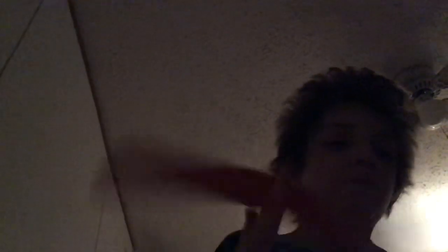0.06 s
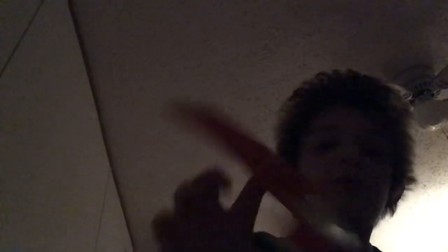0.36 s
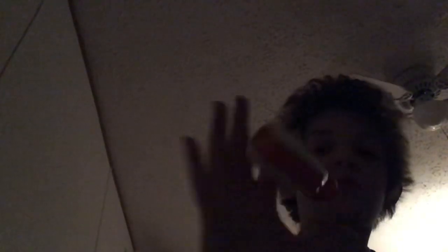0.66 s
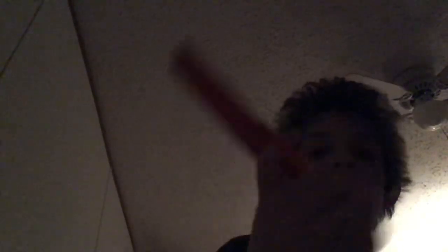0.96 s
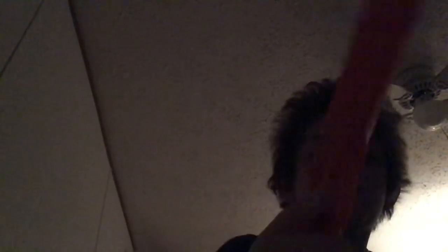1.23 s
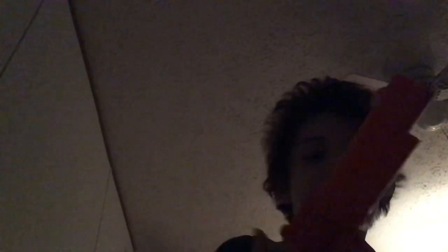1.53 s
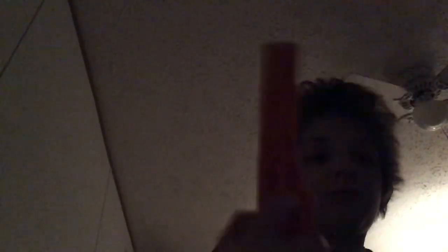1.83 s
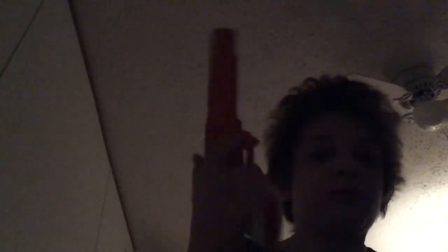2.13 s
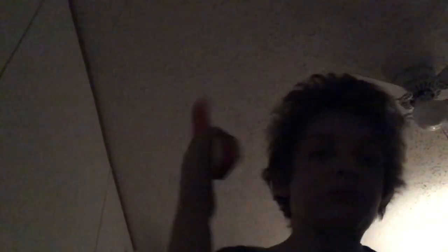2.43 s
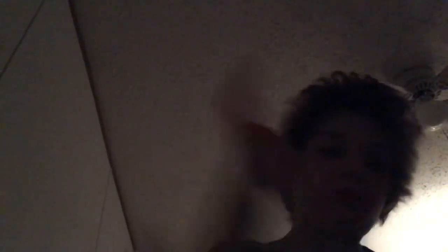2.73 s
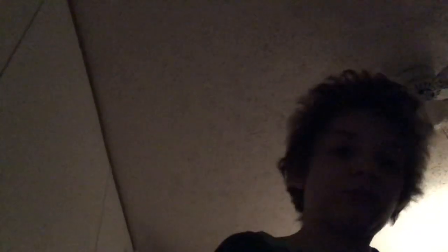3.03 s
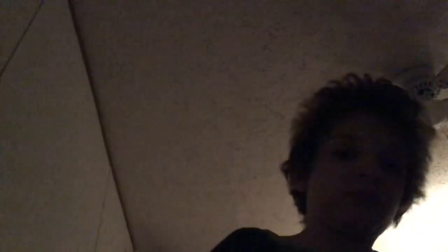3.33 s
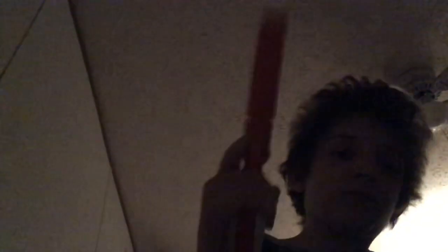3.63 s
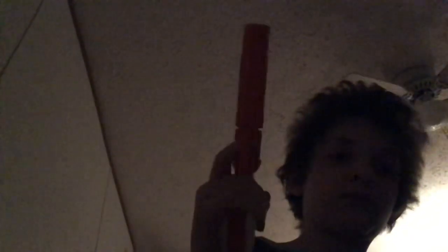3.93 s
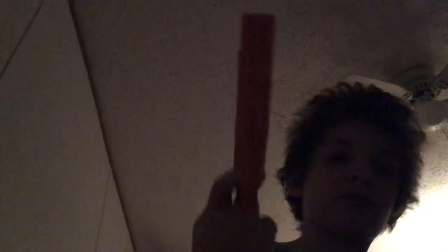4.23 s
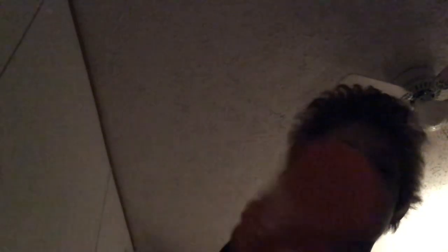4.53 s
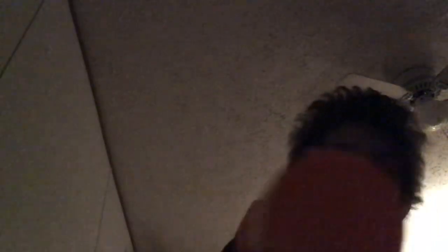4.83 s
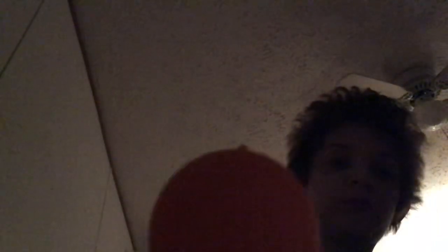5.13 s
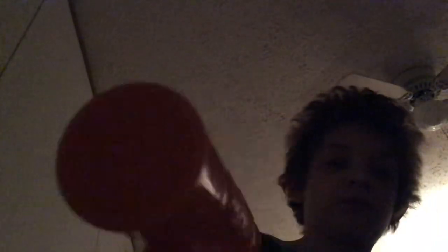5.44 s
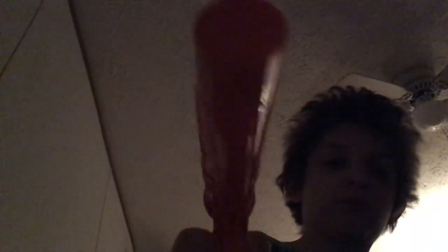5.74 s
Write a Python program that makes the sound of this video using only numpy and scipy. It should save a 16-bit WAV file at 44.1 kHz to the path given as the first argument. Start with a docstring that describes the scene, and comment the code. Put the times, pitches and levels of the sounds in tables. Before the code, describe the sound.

A plastic toy gun is turned in the hand close to a small microphone in a quiet room. It squeaks briefly, then its shell rubs and clicks. It is cocked in a quick cluster of snaps with a faint spring ring, and fires one sharp shot. After a pause with light ticks, two more shots follow quickly, the first of them loudest, with a thump of air on the microphone.

```python
"""A plastic toy gun is turned in the hand, close to a small microphone in a quiet room.
It squeaks briefly in the grip, then its shell rubs and clicks. It is cocked in a cluster of snaps
that ring the spring, and fired three times: one shot, a pause, then two in quick succession.
The second shot hits the microphone with a puff of air from the plunger.
The limiter ducks the loud bangs, so the room's answer swells up just after them."""
import sys
import numpy as np
from scipy import signal
from scipy.fft import rfft, irfft, next_fast_len
from scipy.io import wavfile
from scipy.ndimage import uniform_filter1d, minimum_filter1d, map_coordinates

SR = 44100
rng = np.random.default_rng(int(sys.argv[2]) if len(sys.argv) > 2 else 0)


def store_wav(level_fs):
    """Save 16-bit WAV to argv[1]."""
    pcm = np.round(np.clip(np.atleast_2d(level_fs), -1, 1) * 32767)
    wavfile.write(sys.argv[1], SR, pcm.T.astype(np.int16))


N = 258867

# Hard contacts: the shell knocks hard in the hand, or the catch or plunger strikes home; knock and clack are
# relative to the level: # start_s, level_db, knock_db, clack_db, t60_s, run_up_s, run_up_db, spring_db
SNAPS = [(0.2034, -19.5, -18.5, -17.5, 0.033, 0.0047, -36.5, -70),
         (1.7924, -26.5, -9, -14, 0.023, 0.015, -45, -70), (1.8294, -25, -25, -22, 0.014, 0.014, -43, -65),
         (2.7275, -15.5, -9, -16.5, 0.028, 0.004, -62, -60),
         (2.7395, -17, -17.5, -23.5, 0.023, 0.0066, -33, -40),
         (2.8377, -11.5, -24.5, -23.5, 0.014, 0.0207, -17.5, -46),
         (2.8828, -13, -42, -31, 0.0092, 0.004, -55, -37.5),
         (2.9186, -18, -34, -33, 0.006, 0.004, -43, -51),
         (3.565, 7.5, -23.5, -19, 0.026, 0.0067, -6.5, -28.5),
         (5.3825, 17.5, -17, -19, 0.014, 0.0245, -29, -51),
         (5.6272, -21.5, -9, -7, 0.013, 0.01, -50, -70.5),
         (5.6412, 4.5, -20, -20, 0.016, 0.005, -37.5, -62)]


def amp(db):
    """Decibels to gain."""
    return 10 ** (np.asarray(db) / 20)


def unit(x):
    """Scale to rms 1."""
    return x / np.sqrt(np.mean(x ** 2) + 1e-20)


def along(points, hz):
    """Read a curve of (freq_hz, value) points on a log frequency axis."""
    freqs, values = np.transpose(points)
    return np.interp(np.log(hz + 1), np.log(freqs + 1), values)


def filtered(x, response):
    """Filter x by a complex response, given as a function of frequency."""
    size = next_fast_len(N + SR // 2)
    return irfft(rfft(x, size) * response(np.fft.rfftfreq(size, 1 / SR)), size)[:N]


def noise(spectrum):
    """Coloured noise of rms 1."""
    return unit(filtered(rng.standard_normal(N), lambda hz: amp(along(spectrum, hz))))


def wobble(rate):
    """A smooth random curve with `rate` knots a second."""
    knots = rng.standard_normal(int(N * rate / SR) + 4)
    return map_coordinates(knots, [np.arange(N) * rate / SR])


def add(track, start_s, sound):
    """Mix a sound into the track at start_s."""
    part = track[max(round(start_s * SR), 0):][:len(sound)]
    part += sound[:len(part)]


def hiss():
    """A faint, steady bed of noise."""
    spectrum = [(20, -41), (40, -21), (65, -3.5), (110, -2), (220, -6.5), (400, -8.5), (800, -14.5),
                (1500, -15.5), (3000, -15), (5000, -19.5), (7300, -20), (9200, -13), (11000, -18),
                (13000, -27.5), (16000, -32.5)]  # colour of the bed: freq_hz, level_db
    return amp(-65.5) * noise(spectrum)


def room(x, build_up_s, treble_db):
    """Wall echoes thicken into a short, bright tail whose treble dies first."""
    decay = [(100, 0.27), (500, 0.26), (1500, 0.35), (4000, 0.35), (8000, 0.28), (15000, 0.2)]  # reverb time of the room: freq_hz, t60_s
    hz, t, bands = signal.stft(rng.standard_normal(SR // 2), SR, nperseg=256)
    colour_db = along([(2000, 0), (14000, treble_db)], hz)[:, None]
    decay_db = 60 * t / along(decay, hz)[:, None]
    tail = signal.istft(bands * amp(colour_db - decay_db), SR, nperseg=256)[1]
    tail *= 1 - np.exp(-(np.arange(len(tail)) / SR / build_up_s) ** 2)
    return signal.oaconvolve(x, tail / np.linalg.norm(tail))[:N]


def echoes(clicks, soft_layers, directions):
    """The shell radiates differently in each direction, and each takes its own way round the room."""
    send_curve = [(0, -15), (2.7, -11.5), (3.601, -11.5), (5.39, -16), (5.618, -19)]  # reverb send, lower as the toy nears the microphone: time_s, level_db
    send = amp(np.interp(np.arange(N) / SR, *np.transpose(send_curve)))
    reverb = np.zeros(N)
    for _ in range(directions):
        radiated = action() + handling(clicks) + soft_layers
        reverb += room(send * radiated, build_up_s=0.016, treble_db=7.0)
    return reverb / np.sqrt(directions)


def rubbing(grain_db, grain_hz, catch_db, catch_hz):
    """The toy slides in the palm, catching and letting go; tiny slips roughen slide and strokes."""
    slide = [(0.02, -53), (0.09, -68), (0.17, -57.5), (0.28, -52), (0.41, -61), (0.49, -58.5), (0.53, -97),
             (0.88, -74), (0.93, -57.5), (1.02, -64.5), (1.08, -57.5), (1.24, -60), (1.35, -74.5),
             (1.67, -71), (1.8, -54.5), (1.87, -80)]  # friction as the toy is turned over: time_s, level_db
    strokes = [(1.982, 0.036, -55), (2.64, 0.11, -57.5), (2.743, 0.037, -33.5), (3.016, 0.12, -55),
               (3.337, 0.12, -55), (3.499, 0.15, -51)]  # plastic brushing plastic and skin: start_s, length_s, level_db
    spectrum = [(200, -11.5), (900, -10), (1700, -6.5), (2200, -3.5), (3000, -1.5), (4800, -7), (6800, -5),
                (10000, -6), (12500, -23), (16000, -24)]  # colour of the friction: freq_hz, level_db
    slide_db = np.interp(np.arange(N) / SR, *np.transpose(slide), right=-np.inf)
    envelope = amp(slide_db + catch_db * wobble(catch_hz))
    for start_s, length_s, level_db in strokes:
        progress = np.linspace(0, 1, int(length_s * SR))
        swell = np.abs(np.sin(np.pi * progress ** 0.66))  # quick rise, slower fade
        add(envelope, start_s, amp(level_db) * swell)
    return envelope * unit(noise(spectrum) * amp(grain_db * wobble(grain_hz)))


def squeak(jitter, flutter_db):
    """The grip sticks and slips unevenly, fast enough to give a thin tone."""
    contour = [(0.037, 1500, -73), (0.06, 1480, -54), (0.095, 1464, -55), (0.13, 1450, -70),
               (0.17, 1450, -55.5), (0.2, 1416, -58)]  # path of the squeak: time_s, pitch_hz, level_db
    partials = [(1, -13.5), (2, -1.5), (3, -8.5), (4, -5), (5, -9)]  # its timbre: harmonic_number, level_db
    time_s, pitch_hz, level_db = np.transpose(contour)
    t = np.arange(N) / SR
    wavering_hz = np.interp(t, time_s, pitch_hz) * (1 + jitter * wobble(900))
    phase = 2 * np.pi * np.cumsum(wavering_hz) / SR
    tone = sum(amp(db + flutter_db * wobble(149)) * np.sin(k * phase) for k, db in partials)
    return unit(tone) * np.interp(t, time_s, amp(level_db), left=0, right=0)


def contacts(hits, crack_db, knock_db, clack_db, ring_out, attack_s):
    """Each contact cracks at the edge, knocks the hollow of the shell and clacks in the walls."""
    # Colours of the bright edge, the hollow and the walls: freq_hz, level_db
    crack_spectrum = [(300, -34.5), (1200, -21.5), (2200, -21.5), (3200, -15), (5400, -3.5), (6600, 3.5),
                      (7400, 1), (8800, 2.5), (10500, -2), (12500, -8), (15000, -15.5), (16500, -32.5)]
    knock_spectrum = [(30, -46), (100, -20), (300, -14), (550, -3), (820, -9), (1150, -10), (1650, 1),
                      (2050, -7), (2900, -5), (4500, -9), (9000, -23)]
    clack_spectrum = [(800, -25), (2100, -14.5), (2600, 0.5), (3100, 2.5), (3450, -3), (3900, 1.5),
                      (5000, -9), (8000, -12), (16000, -38)]
    t = np.arange(SR // 4) / SR
    crack, knock, clack = np.zeros((3, N))
    rise = 1 - np.exp(-t / attack_s)
    for start_s, level_db, hollow_db, wall_db, t60_s in hits:  # overlapping contacts add in power
        add(crack, start_s, (amp(level_db - 60 * t / t60_s) * rise) ** 2)
        body = amp(level_db - 60 * t / (t60_s * ring_out)) * rise
        add(knock, start_s, (amp(hollow_db) * body) ** 2)
        add(clack, start_s, (amp(wall_db) * body) ** 2)
    # The shell's many damped modes blur into noise.
    layers = [(crack_db, crack, crack_spectrum), (knock_db, knock, knock_spectrum),
              (clack_db, clack, clack_spectrum)]
    return sum(amp(db) * np.sqrt(power) * noise(spectrum) for db, power, spectrum in layers)


def fidget_ticks(per_s, scatter_db):
    """Cues for handling(): loose parts tick faintly at uneven gaps as the fingers shift their grip."""
    fidgets = [(0.36, 0.4), (1.08, 1.22), (1.49, 1.66), (2.02, 2.17), (4.48, 4.59), (5.26, 5.34)]  # spells of finger movement: start_s, end_s
    level_db, knock_db, clack_db = -47.5, -14, -9
    ticks = []
    for start_s, end_s in fidgets:
        slots = np.arange(start_s, end_s, 1 / per_s)
        for slot_s, (late, strength) in zip(slots, rng.random((len(slots), 2))):
            tick_db = level_db + scatter_db * (2 * strength - 1)
            ticks.append((slot_s + late / per_s, tick_db, knock_db, clack_db))
    return ticks


def handling(clicks, t60_s=0.022):
    """Loose parts click as the toy turns in the hand."""
    hits = [(*click, t60_s) for click in clicks]
    return contacts(hits, crack_db=-8.0, knock_db=4.0, clack_db=2.0, ring_out=1.73, attack_s=0.00044)


def shell_notes():
    """A knock rings one damped note of the shell, set by where it is struck and held."""
    knocks = [(0.204, 493, -41, 0.037), (1.123, 3240, -35.5, 0.021), (1.7934, 1660, -35, 0.034),
              (2.825, 1528, -28.5, 0.037), (3.566, 1120, -18, 0.015), (3.567, 654, -27.5, 0.0098)]  # hollow notes: start_s, pitch_hz, level_db, t60_s
    t, notes = np.arange(SR // 4) / SR, np.zeros(N)
    for start_s, pitch_hz, level_db, t60_s in knocks:
        add(notes, start_s, amp(level_db - 60 * t / t60_s) * np.sin(2 * np.pi * pitch_hz * t))
    return notes


def spring(scatter_db):
    """Every snap rings the spring's modes at new strengths."""
    modes = [(1530, -19, 0.09), (2896, -13, .42), (3800, -17, 0.149), (6300, -9.5, .09), (6550, 8, 0.041),
             (7000, -2, .07), (7850, -6.5, 0.07), (8310, -8, .06), (9400, -5.5, .07), (10270, -4.5, 0.1)]  # resonances of the spring and its catch: pitch_hz, level_db, t60_s
    t, ring = np.arange(SR // 2) / SR, np.zeros(N)
    pitch_hz, level_db, t60_s = np.transpose(modes)[:, :, None]
    tones = amp(level_db - 60 * t / t60_s) * np.sin(2 * np.pi * pitch_hz * t)
    for start_s, *_, spring_db in SNAPS:
        strengths = amp(spring_db + rng.normal(0, scatter_db, len(modes)))
        add(ring, start_s, strengths @ tones)
    return ring


def puff(start_s, level_db, tilt_db, corner_hz=58, top_hz=900):
    """The plunger's air reaches the microphone as one low push; more tilt makes it thinner."""
    def response(hz):
        hump = (hz / corner_hz) ** 5 / (1 + (hz / corner_hz) ** 2) ** 4 / (1 + (hz / top_hz) ** 4)
        colour = hump * amp(tilt_db * np.log2(hz + 1))
        return colour / np.mean(colour)

    push = np.zeros(N)
    add(push, start_s, amp([level_db]))
    return filtered(push, response)


def action(teeth=4, rebound_s=0.0085, rebound_loss_db=8, rebound_max_db=-15):
    """Hard knocks in the hand, cocking and firing: each snap is a run-up over evenly spaced teeth, a blow and
    one rebound."""
    chatter = (-10.5, -16, 0.02)  # the plunger on the teeth of its guide: knock_db, clack_db, t60_s
    hits = []
    for start_s, level_db, knock_db, clack_db, t60_s, run_up_s, run_up_db, _ in SNAPS:
        tooth_times = np.linspace(start_s - run_up_s, start_s, teeth, endpoint=False)
        hits += [(tooth_s, run_up_db, *chatter) for tooth_s in tooth_times]
        hits.append((start_s, level_db, knock_db, clack_db, t60_s))
        rebound_db = min(level_db - rebound_loss_db, rebound_max_db)  # capped by the short travel
        hits.append((start_s + rebound_s, rebound_db, knock_db, clack_db, t60_s))
    return contacts(hits, crack_db=-6.5, knock_db=-0.5, clack_db=3.5, ring_out=0.84, attack_s=0.00076)


def scene():
    """The toy and its room over a faint hiss, in mono."""
    # Light clicks of shell and trigger; knock and clack are relative to the level:
    # start_s, level_db, knock_db, clack_db
    shell_clicks = [(0.312, -42, -29, -5), (0.332, -35.5, -34, -34), (0.3726, -38, -16, -15.5),
                    (0.4078, -39, -17, -9.5), (0.444, -33.5, -12.5, -11.5), (0.538, -42.5, -16.5, -10.5),
                    (0.7926, -39, -24, -12.5), (0.799, -27.5, -25, -15), (0.9263, -34, -35, -18),
                    (1.037, -27, -33, -20.5), (1.061, -33, -20, -13.5), (1.1209, -28, -24, -14.5),
                    (1.142, -36.5, -26, -12), (1.1882, -41, -15, -13), (1.3151, -36, -13, -9.5),
                    (1.3882, -30.5, -26, -28), (1.3979, -31.5, -25, -20), (1.446, -35, -15, -16),
                    (1.4574, -36, -29, -19), (1.6767, -46.5, -27, -4), (1.722, -41.5, -18, -4.5),
                    (1.765, -27.5, -25, -11.5), (2.134, -42, -11.5, -28), (2.2655, -38.5, -23, -14.5),
                    (2.3077, -37, -21, -23), (2.388, -35, -17.5, -19), (2.5327, -41, -13, -18),
                    (2.5867, -38, -18.5, -17), (3.3812, -38, -20, -20), (3.7543, -37, -16, -17),
                    (4.3302, -38.5, -16, -19.5), (4.8579, -39.5, -29, -13.5), (4.934, -35.5, -21, -11),
                    (5.1214, -43, -31, -10.5), (5.234, -37.5, -32, -12.5), (5.2855, -39.5, -13, -10),
                    (5.3035, -43, -6.5, -10)]
    puffs = [(2.829, -35.5, 6), (3.568, -32.5, 8.5), (5.385, -6, 16), (5.3929, -1, 1.5), (5.646, -30, 5)]  # air from the plunger: start_s, level_db, tilt_db_per_octave
    soft_layers = spring(scatter_db=2.5) + shell_notes()
    soft_layers += rubbing(grain_db=3.0, grain_hz=220, catch_db=2, catch_hz=45)
    soft_layers += squeak(jitter=0.029, flutter_db=3.5)
    air = sum(puff(*row) for row in puffs)
    bed = hiss()
    clicks = list(shell_clicks) + fidget_ticks(per_s=24, scatter_db=1.5)
    direct = action() + handling(clicks) + soft_layers + air
    return (bed + direct + echoes(clicks, soft_layers, directions=3))[None]


def microphone(x, lag_cycles, low_hz, high_hz):
    """Between two corners the microphone's bass arrives late, so a push becomes a falling thump."""
    def response(hz):
        phase = -2 * np.pi * lag_cycles * np.log((hz + low_hz) / (hz + high_hz))
        return np.exp(1j * phase)

    return filtered(x, response)


def limiter(x, ceiling_db, release_db_per_s):
    """The gain drops at once for a peak and climbs back at a steady rate."""
    over_db = np.maximum(20 * np.log10(np.abs(x) + 1e-9) - ceiling_db, 0)
    recovery_db = release_db_per_s * np.arange(N) / SR
    cut_db = np.maximum.accumulate(over_db + recovery_db) - recovery_db
    held_gain = minimum_filter1d(amp(-cut_db), size=45)  # about 1 ms
    return x * uniform_filter1d(held_gain, size=45)


def record(dry):
    """Microphone, limiter, low cut and band limit."""
    low_cut_hz, top_hz = 36, 16200
    heard = microphone(dry[0], lag_cycles=1.9, low_hz=17, high_hz=870)
    ducked = limiter(heard, ceiling_db=-1.5, release_db_per_s=380.0)
    passband = lambda hz: (hz < top_hz) * hz ** 2 / np.hypot(hz ** 2, low_cut_hz ** 2)
    return filtered(ducked, passband)[None]


dry = scene()
out = record(dry)
store_wav(out)
```